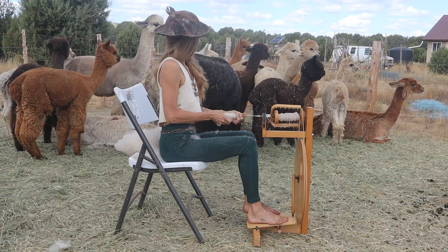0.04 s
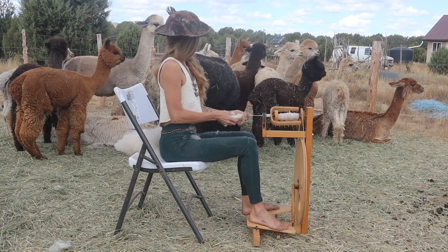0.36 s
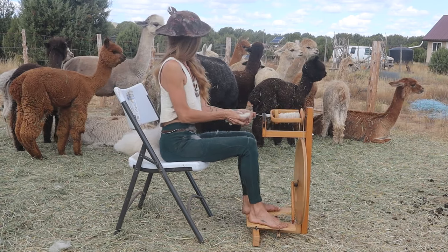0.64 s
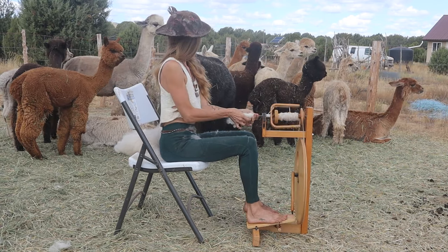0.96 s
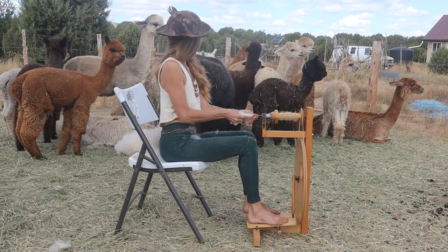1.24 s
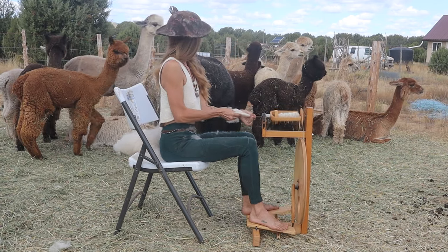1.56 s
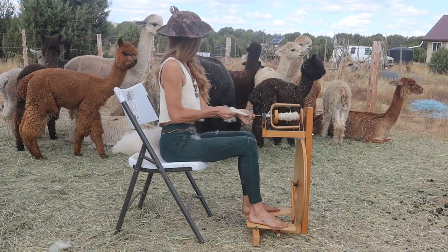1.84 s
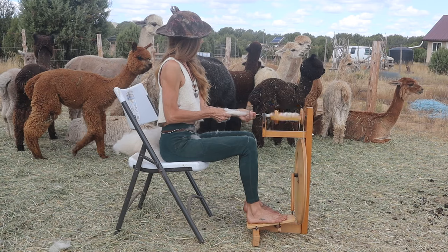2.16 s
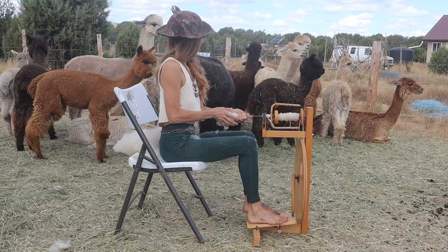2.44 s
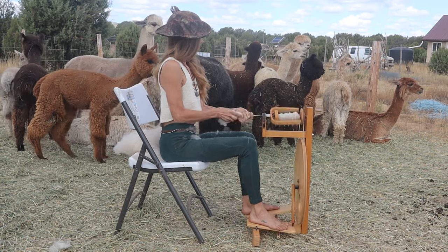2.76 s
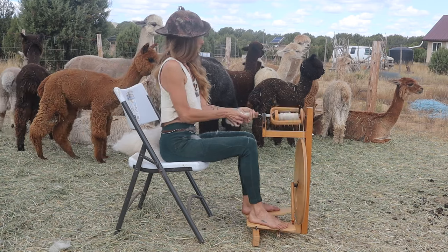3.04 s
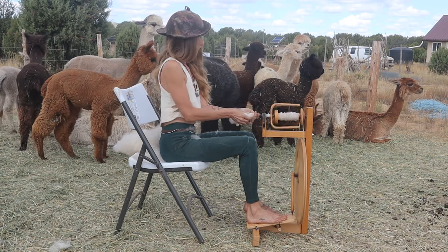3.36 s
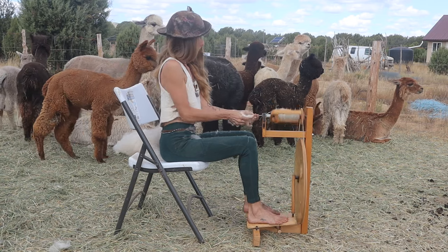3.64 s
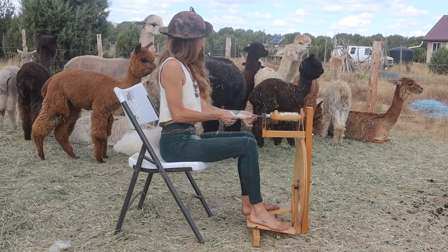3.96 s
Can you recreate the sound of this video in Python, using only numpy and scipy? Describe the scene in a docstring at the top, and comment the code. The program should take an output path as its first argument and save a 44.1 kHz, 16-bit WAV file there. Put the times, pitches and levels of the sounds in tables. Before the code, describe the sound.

Soft, regular ticking of a treadled spinning wheel, with two sharp clicks and light wind.

```python
"""An open paddock, where a wooden spinning wheel is treadled. The flyer ticks about four times a second,
ringing the frame, and the bobbin rattles softly on its shaft; a hard part clicks sharply twice and
the treadle knocks once. Wool hisses through the fingers. Light wind rumbles on a nearly mono
microphone, over a soft rustle, a few dry snaps, a brief hum and a faint whine."""
import sys
import numpy as np
from scipy import signal
from scipy.fft import rfft, irfft, next_fast_len
from scipy.io import wavfile
from scipy.ndimage import map_coordinates

SR = 44100
rng = np.random.default_rng(int(sys.argv[2]) if len(sys.argv) > 2 else 0)


def wav_out(sig):
    """Save sig, one row per channel (or a flat mono array), as 16-bit PCM at SR to the path in sys.argv[1]."""
    wavfile.write(sys.argv[1], SR, np.round(np.clip(np.atleast_2d(sig).T, -1, 1) * 32767).astype(np.int16))


N = 176400

# colour of wood cracking and scraping on wood (frequency [Hz], level [dB])
WOOD_COLOUR = [(200, -18), (450, 6), (800, 0.5), (1400, 6.5), (2200, -9), (3200, -15), (5000, -25),
               (9000, -43), (16000, -49)]


def amp(db):
    return 10 ** (np.asarray(db) / 20)


def unit(x):
    return x / np.sqrt(np.mean(x ** 2) + 1e-20)


def curve(rows):
    """Breakpoints (time [s], value) as one value per sample."""
    return np.interp(np.arange(N) / SR, *np.transpose(rows))


def wobble(rate):
    """A smooth random curve, rate knots a second."""
    knots = rng.standard_normal(int(N * rate / SR) + 4)
    return map_coordinates(knots, [np.arange(N) * rate / SR])


def swell(middle_s, half_s):
    """A bell-shaped envelope."""
    return np.exp(-.5 * ((np.arange(N) / SR - middle_s) / half_s) ** 2)


def decay(t, t60, hold_s=0):
    """An envelope that holds, then falls 60 dB every t60 seconds."""
    return np.exp(-np.log(1000) * np.maximum(t - hold_s, 0) / t60)


def filtered(x, response):
    """Equalise x with a gain that is a function of frequency."""
    size = next_fast_len(N + SR // 2)
    return irfft(rfft(x, size) * response(np.fft.rfftfreq(size, 1 / SR)), size)[..., :N]


def noise(spectrum, tilt_db=0):
    """Noise of rms 1, coloured by (frequency [Hz], level [dB]) rows and tilted per octave."""
    hz, db = np.transpose(spectrum)
    colour = np.interp(np.log(np.fft.rfftfreq(N, 1 / SR) + 1), np.log(hz), db + tilt_db * np.log2(hz))
    return unit(irfft(rfft(rng.standard_normal(N)) * amp(colour), N))


def ring(modes, tilt_db=0, scatter_db=2.5, detune=.0082):
    """The decaying modes of a struck part, a little different in level and pitch at every touch."""
    t = np.arange(SR // 8) / SR
    hz, db, t60 = np.transpose(modes)[:, :, None]
    level = db + tilt_db * np.log2(hz / np.median(hz)) + scatter_db * rng.standard_normal(hz.shape)
    hz = hz * (1 + detune * rng.standard_normal(hz.shape))
    sign = np.sign(rng.standard_normal(hz.shape))
    return np.sum(sign * amp(level) * decay(t, t60) * np.sin(2 * np.pi * hz * t), axis=0)


def add(track, s, sound):
    """Mix a sound in at time s."""
    part = track[int(s * SR):][:len(sound)]
    part += sound[:len(part)]


def contacts(events, modes, colour, crack_db, crack_t60):
    """Each hit rings the modes and chatters on; its noisy crack holds through the chatter, then dies."""
    attack_s, chatter_s, chatter_db, touches = .00052, .009, -5.5, 4
    out, t = np.zeros(N), np.arange(SR // 8) / SR
    attack = 1 - np.exp(-t / attack_s)
    fade = decay(t, crack_t60, hold_s=chatter_s)
    for s, db, tilt_db in events:
        crack = amp(crack_db) * fade * noise(colour, tilt_db)[:len(t)]
        add(out, s, amp(db) * attack * (ring(modes, tilt_db) + crack))
        for k in range(touches):
            touch_s = s + chatter_s * (k + rng.random()) / touches
            add(out, touch_s, amp(db + chatter_db) * ring(modes, tilt_db))
    return out


def wind(gain_db=1, buffet_db=.14):
    """Light gusts rumble on the microphone."""
    # gust envelope (time [s], relative level [dB])
    gusts = [(0.0, -37), (0.1, -34), (0.36, -43), (0.38, -35.5), (0.62, -30.5), (0.71, -33), (2.04, -37),
             (2.09, -42), (2.17, -33), (2.43, -39.5), (3.14, -40), (3.16, -45), (3.29, -36), (3.41, -45.5),
             (3.54, -36.5), (3.71, -44.5), (3.78, -38), (4.0, -50.5)]
    # rumble colour (frequency [Hz], level [dB])
    rumble = [(8, -14), (25, 2), (40, -2.5), (60, -6), (100, -12), (160, -20), (250, -27.5), (400, -40),
              (1000, -65), (4000, -107)]
    return amp(curve(gusts) + gain_db + buffet_db * wobble(12)) * noise(rumble)


def paddock(air_db=-57.5, flutter_db=3.2):
    """A bed of steady outdoor hiss and a soft, fluttering rustle."""
    # colour of the open air (frequency [Hz], level [dB])
    air_colour = [(100, -3.5), (450, 2), (800, -2.5), (1500, -13), (2500, -12), (5000, -11), (8000, -13),
                  (10000, -14.5), (16000, -14.5)]
    # rustle envelope (time [s], level [dB])
    rustle_levels = [(0, -67), (.22, -59), (.5, -59.5), (.7, -69.5), (1.05, -61), (1.25, -65.5), (4, -66.5)]
    # rustle colour (frequency [Hz], level [dB])
    rustle_colour = [(300, -16), (900, -4.5), (1600, -3.5), (2600, -9), (4500, -16.5), (9000, -24)]
    air = amp(air_db) * noise(air_colour)
    rustle = amp(curve(rustle_levels) + flutter_db * wobble(25.28)) * noise(rustle_colour)
    return air + rustle


def wide_hiss(level_db=-73):
    """Faint hiss that differs between the ears."""
    # hiss colour (frequency [Hz], level [dB])
    colour = [(150, -31), (330, 2), (800, 2), (1400, -12), (4000, -4.5), (7500, -2.5), (12000, 4.5),
              (16000, 2)]
    return amp(level_db) * noise(colour)


def wool(gain_db=-4):
    """Fibres hiss as they slide through the fingers."""
    # drafting envelope (time [s], relative level [dB])
    drafting = [(0, -68), (.7, -65), (.8, -60.5), (1.1, -69), (1.45, -57.5), (1.65, -63), (1.8, -59),
                (2.1, -64), (2.42, -66), (2.5, -59.5), (2.75, -63), (3.0, -59.5), (3.08, -57.5),
                (3.17, -58), (3.28, -52), (3.36, -62), (3.5, -61.5), (3.72, -58), (3.85, -66), (4, -60)]
    # colour of the sliding fibres (frequency [Hz], level [dB])
    fibres = [(1500, -6), (3000, -6), (4600, -3), (5600, -10.5), (7600, 1), (9500, -5.5), (13000, -3.5),
              (16000, -8)]
    return amp(curve(drafting) + gain_db) * noise(fibres)


def flyer(gain_db=-10.5):
    """The flyer ticks against the frame once a turn."""
    # ticks and their rebounds (time [s], relative level [dB], treble tilt [dB/octave])
    ticks = [(.029, -43, -5), (.131, -39.5, 1), (.234, -32, -1), (.345, -34, 0), (.464, -32, 4),
             (.758, -29.5, 3.5), (.782, -36, 4.5), (.899, -39.5, -1.5), (1.261, -36.5, -1.5),
             (1.478, -37, -1), (1.577, -32.5, 2.5), (1.687, -28.5, 4), (1.905, -32, 2.5),
             (2.144, -32.5, 2.5), (2.392, -30.5, 1.5), (2.402, -37, 1), (2.447, -38.5, -3), (2.619, -31, 3),
             (2.855, -31, 2.5), (2.912, -41, 1), (3.089, -33, 2.5), (3.406, -31.5, 1), (3.534, -36, 2),
             (3.645, -31, 1.5), (3.771, -40, 1), (3.784, -34, 2), (3.869, -42.5, -4.5)]
    # modes of the wooden frame (frequency [Hz], level [dB], t60 [s])
    frame = [(426.6, -11, 0.14), (474, -11, 0.22), (554, -9, 0.071), (715.4, -1.5, 0.048),
             (832, -8.5, 0.087), (1204, -9.5, 0.069), (1313, -2.5, 0.038), (1473, -7, 0.042),
             (1634, -27, 0.025), (2008, -13, 0.031), (2185, -10.5, 0.014), (2750, -22, 0.021),
             (2975, -11, 0.033), (3370, -21.5, 0.012)]
    return amp(gain_db) * contacts(ticks, frame, WOOD_COLOUR, crack_db=-5, crack_t60=.038)


def bobbin(touches_per_s=700, scrape_db=-6):
    """Many tiny touches ring the bobbin while it shifts and scrapes on its shaft."""
    # soft rattles (middle [s], half length [s], level [dB])
    rattles = [(.035, 0.019, -54), (.18, 0.045, -61), (.37, .02, -61.5), (0.569, .03, -56),
               (0.867, 0.025, -54.5), (1.171, 0.011, -55), (1.268, 0.0078, -51.5), (1.496, 0.023, -54),
               (1.601, 0.0084, -52.5), (1.804, 0.012, -51), (2.029, 0.018, -54), (2.176, 0.0067, -54),
               (2.293, 0.012, -51.5), (2.424, 0.012, -52), (2.515, 0.019, -50.5), (2.663, 0.014, -56.5),
               (2.752, 0.012, -49), (2.977, 0.015, -51), (3.322, 0.0069, -49.5), (3.551, .02, -53),
               (3.511, 0.008, -54), (3.685, 0.0076, -63)]
    # modes of the bobbin and its shaft (frequency [Hz], level [dB], t60 [s])
    shaft = [(460, -9, 0.076), (555, -7.5, 0.062), (703, -1.5, 0.047), (833.5, -2, 0.068),
             (1014, -5.5, 0.017), (1300, -2, 0.031), (1440, -4.5, 0.023), (1970, -14.5, .02),
             (3020, -9.5, 0.016)]
    touches = (rng.random(N) < touches_per_s / SR) * rng.standard_normal(N)
    ringing = unit(signal.fftconvolve(touches, ring(shaft))[:N])
    scrape = amp(scrape_db) * noise(WOOD_COLOUR)
    envelope = sum(amp(db) * swell(s, half_s) for s, half_s, db in rattles)
    return unit(ringing + scrape) * envelope


def hum(middle_s=.318, pitch_hz=275, rise_hz_per_s=1100):
    """A brief, faint hum, perhaps an alpaca, that rises in pitch as it swells and fades."""
    # the hum's first two harmonics (level [dB])
    harmonics = [-48.5, -45.5]
    t = np.arange(N) / SR - middle_s
    cycles = pitch_hz * t + rise_hz_per_s * t ** 2 / 2
    tone = sum(amp(db) * np.sin(2 * np.pi * k * cycles) for k, db in enumerate(harmonics, 1))
    return swell(middle_s, half_s=.012) * tone


def snaps():
    """Thin, dry snaps, perhaps of straw: bursts of noise with no ring."""
    # snap cues (time [s], level [dB], treble tilt [dB/octave])
    cues = [(.511, -47, -0.5), (.844, -45, 0), (1.975, -47, -.5), (3.363, -42.5, 1), (3.785, -46.5, 1)]
    # snap colour (frequency [Hz], level [dB])
    colour = [(250, -12), (700, 5.5), (1400, -4), (3200, -9), (4500, -14.5), (5700, -23), (7200, -13),
              (9500, -24), (15000, -21)]
    out, t = np.zeros(N), np.arange(SR // 8) / SR
    fade = decay(t, t60=.022, hold_s=.0048)
    for s, db, tilt_db in cues:
        add(out, s, amp(db) * fade * noise(colour, tilt_db)[:len(t)])
    return out


def whine(centre_hz=1390, width_hz=170, level_db=-58.5):
    """A faint, airy whine: noise in one narrow resonance swells and fades."""
    band = filtered(rng.standard_normal(N), lambda hz: 1 / (1 + ((hz - centre_hz) / width_hz * 2) ** 2))
    return amp(level_db) * swell(middle_s=1.015, half_s=.04) * unit(band)


def clicks(gain_db=-10):
    """A hard part is struck and gives a sharp, bright click."""
    # click cues (time [s], relative level [dB], treble tilt [dB/octave])
    cues = [(1.387, -21, 0.5), (3.9905, -26, -2)]
    # modes of the hard part (frequency [Hz], level [dB], t60 [s])
    modes = [(452, -22, 0.061), (670, -10.5, 0.079), (1314, -12, 0.074), (1560, -2, 0.021),
             (2102, -4, 0.081), (2627, -7, 0.034), (3010, -4.5, 0.034), (3433, -2.5, 0.032),
             (4454, -3.5, 0.029), (5040, -7, .04), (5620, -19, .05), (6260, -10, 0.018), (6800, -15, 0.016),
             (7540, -12.5, .028)]
    # colour of the click's crack (frequency [Hz], level [dB])
    colour = [(200, -3), (500, 2), (3300, 0), (3900, -21), (4600, -4.5), (7500, -5), (8800, -16.5),
              (10500, -13.5), (16000, -38)]
    return amp(gain_db) * contacts(cues, modes, colour, crack_db=.5, crack_t60=.027)


def treadle(knock_s=2.0475, gain_db=-38):
    """One dull knock rings the treadle."""
    # modes of the treadle (frequency [Hz], level [dB], t60 [s])
    modes = [(746, 0, .045), (1020, -5, .02), (1240, 6, 0.028), (1480, -1.5, 0.02), (2070, -11, .018),
             (3280, -15, 0.013)]
    out = np.zeros(N)
    add(out, knock_s, amp(gain_db) * ring(modes))
    return out


def echo(x, level_db=-14, t60=.2):
    """The ground and surroundings scatter back a short tail."""
    t = np.arange(SR // 3) / SR
    tail = rng.standard_normal(len(t)) * decay(t, t60)
    return amp(level_db) * signal.fftconvolve(x, tail / np.linalg.norm(tail))[:N]


def scene():
    """Everything sits in the middle; only faint hiss is wide."""
    near = flyer() + bobbin() + snaps() + clicks() + treadle()
    mid = wind() + paddock() + wool() + near + echo(near) + hum() + whine()
    side = wide_hiss()
    return np.array([mid + side, mid - side])


def record(dry):
    """A brick-wall low-pass cuts the very top of the treble."""
    top_hz = 15800
    return filtered(dry, lambda hz: hz < top_hz)


dry = scene()
out = record(dry)
wav_out(out)
```